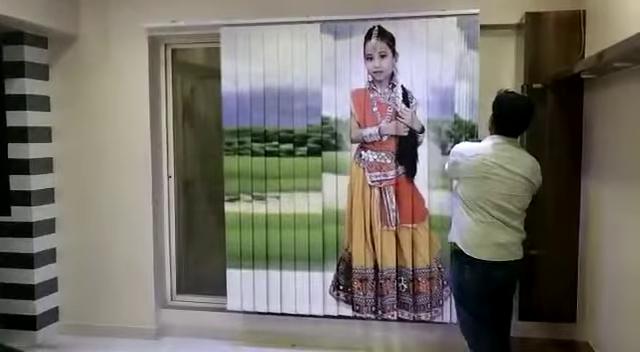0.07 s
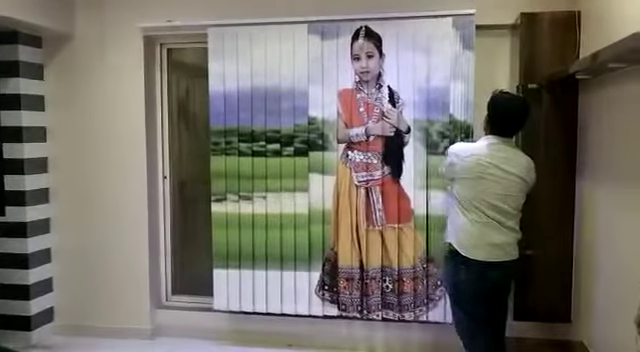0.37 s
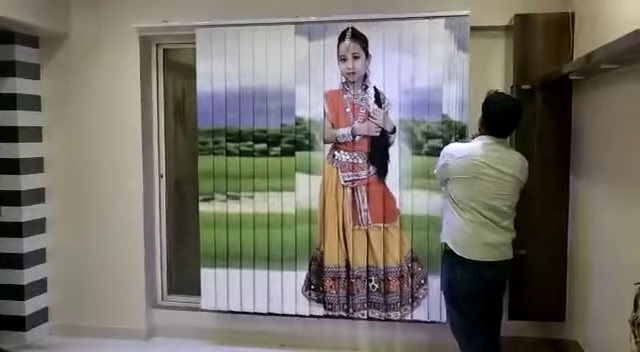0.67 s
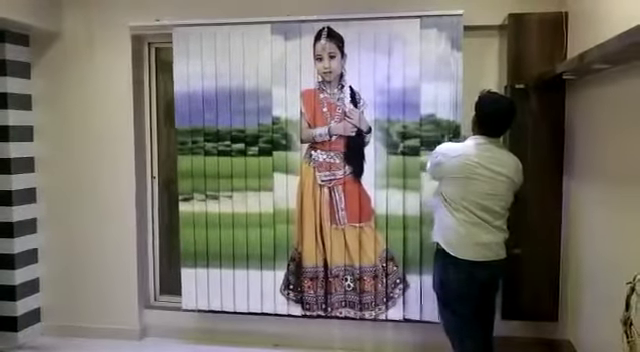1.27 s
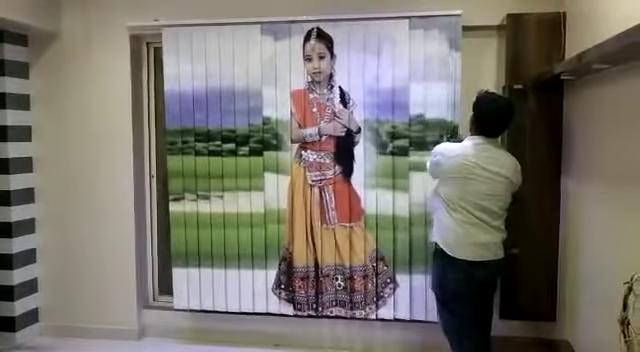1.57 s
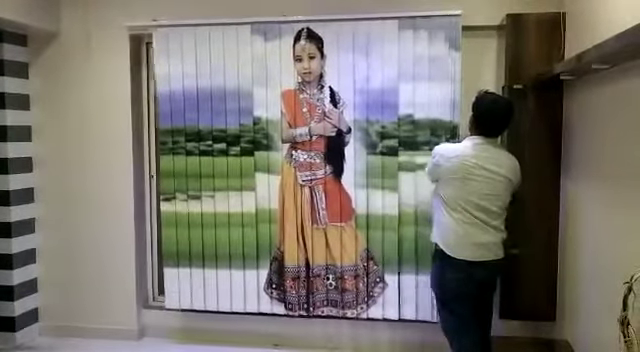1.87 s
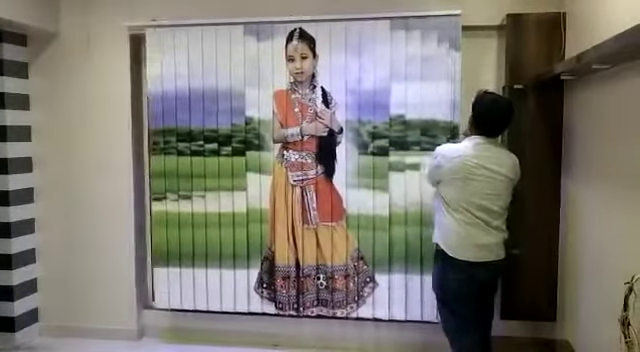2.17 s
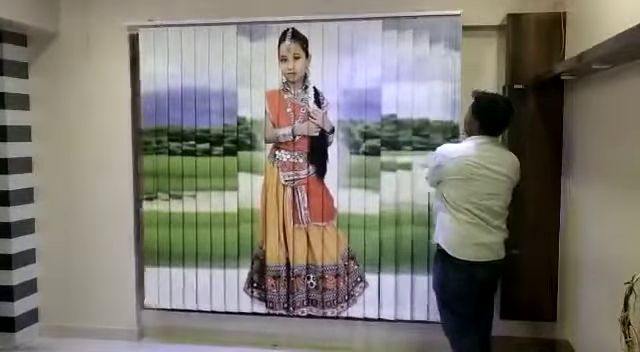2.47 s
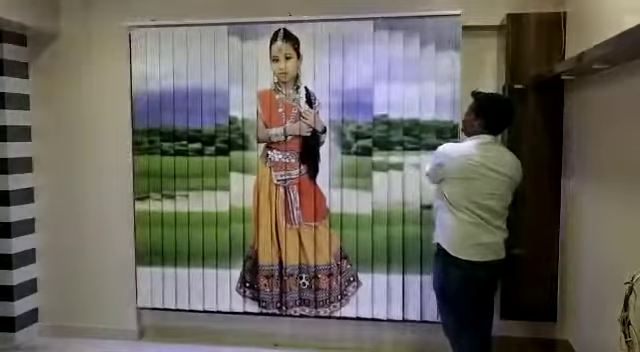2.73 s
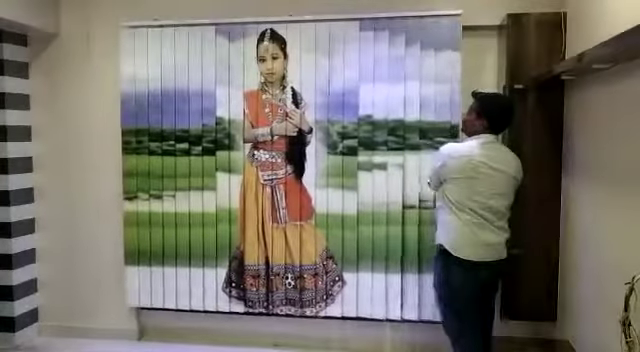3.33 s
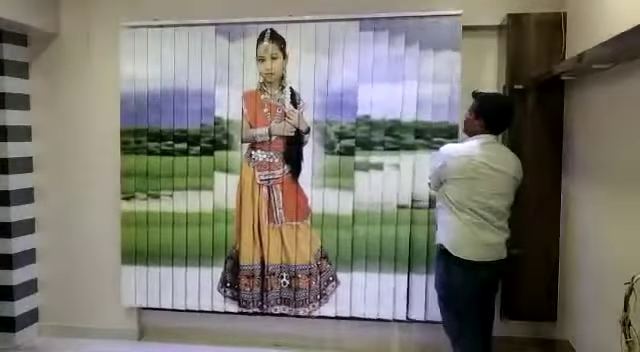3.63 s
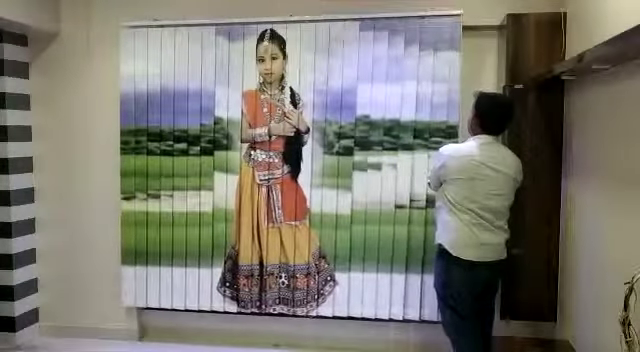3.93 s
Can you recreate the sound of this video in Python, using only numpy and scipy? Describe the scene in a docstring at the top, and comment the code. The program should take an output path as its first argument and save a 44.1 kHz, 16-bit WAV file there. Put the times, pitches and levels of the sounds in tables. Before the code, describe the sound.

Vertical blinds slide along their track from the start, a rubbing, finely ticking hiss that swells and dips with each pull while the rail rings on one flickering note. At about 3.2 seconds a last shove adds a low boom, and the gliders knock twice to a stop. The bare room's echo fades. Near 3.9 seconds the slats rustle softly and a glider squeaks faintly over a quiet fan.

```python
"""Vertical blinds are drawn along their track, pull after pull, in a bare, echoing room.
The gliders rub and tick in the rail, which sings one strong note over a few weaker rings.
A last shove brings a low boom, and the gliders knock to a stop.
The room dies away, then the slats rustle once and a settling glider squeaks over a faint fan."""
import sys
import numpy as np
from scipy import signal
from scipy.fft import rfft, irfft
from scipy.io import wavfile
from scipy.ndimage import uniform_filter1d

SR = 44100
rng = np.random.default_rng(int(sys.argv[2]) if len(sys.argv) > 2 else 0)


def unload_wav(signal):
    """Save mono or channel-first audio to the path in sys.argv[1] as 16-bit WAV at rate SR, clipped to [-1, 1]."""
    wavfile.write(
        sys.argv[1],
        SR,
        np.round(np.clip(np.atleast_2d(signal).T, -1, 1) * 32767).astype(np.int16),
    )


N = 176400
TIME = np.arange(N) / SR
FREQS = np.maximum(np.arange(N // 2 + 1) * SR / N, 1)

# how hard the blinds are pulled: (time [s], effort [dB])
PULL_EFFORT = [(0, -1.1), (.14, -0.9), (.265, -5), (.35, -1), (.47, 0.4), (.56, -1.5), (.68, -0.6),
               (.77, -6), (.88, -5), (.95, -2), (1.02, 2.5), (1.14, 0.5), (1.28, -1), (1.48, -0.5),
               (1.63, -2), (1.74, 0.8), (1.89, 0.5), (2.04, -1.56), (2.25, -1.5), (2.36, -5), (2.44, -2),
               (2.52, 1), (2.71, 2), (2.89, -3.5), (3.06, 0.4), (3.17, 2), (3.26, -1)]
# base colour of the glider friction: (frequency [Hz], level [dB/Hz])
RUB_COLOUR = [(50, -118), (110, -104), (150, -92), (240, -76.5), (520, -75.5), (850, -72), (1200, -69.5),
              (1850, -62.5), (2700, -68), (3600, -68), (4400, -74.5), (6000, -71.5), (7400, -73.5),
              (8800, -69.5), (9900, -75), (12000, -78.5), (13800, -82.5), (16000, -84)]
# body the last shove adds to the friction: (frequency [Hz], boost [dB])
SHOVE_BOOST = [(200, 1), (700, 5), (1200, 11), (2000, 1.5)]
# the friction's top end opens along the travel: (frequency [Hz], rise [dB/s])
RUB_BRIGHTENING = [(6000, 0), (13000, 0.5)]
# the rail's main note: (frequency [Hz], bandwidth [Hz], base peak [dB/Hz], left over right [dB])
NOTE_MODES = [(1360, 8.9, -49, 2.5), (1387, 54.3, -54.5, -6)]
# brief, irregular flares of the rail's note: (time [s], width [s], boost [dB])
NOTE_FLARES = [(.05, 0.021, 4.5), (.125, 0.054, 3), (.345, 0.0095, 0), (.435, 0.013, 3.5), (.542, 0.029, 6),
               (.762, 0.0078, 7), (1.04, .012, 4), (1.082, 0.018, 7.5), (1.14, 0.0078, 10),
               (1.183, 0.0099, 9.5), (1.365, 0.051, 5.5), (1.471, 0.0091, 8.5), (1.55, 0.019, 7),
               (1.64, 0.013, 7.5), (1.692, 0.018, 5), (1.74, 0.01, 8), (1.87, 0.027, 7.5),
               (1.966, 0.011, 4), (2.217, 0.01, 6), (2.352, 0.011, 6.5), (2.489, .012, 6),
               (2.635, 0.05, 4.5), (2.737, 0.021, 7), (2.84, 0.044, 3), (3.288, .012, 0.5)]
# the rail's weaker rings: (frequency [Hz], bandwidth [Hz], base peak [dB/Hz], left over right [dB])
WEAK_MODES = [(1242, 106, -61, 4.5), (3160, 154, -61.5, 1), (5100, 170, -68, 0), (6310, 35, -65.5, -3),
              (6354, 105, -68.5, -8.5), (7810, 590, -73.5, 0), (11230, 110, -76, 7),
              (12800, 150, -79.5, -1)]
# gliders bumping to a stop: (time [s], strike level [dB/Hz])
GLIDER_KNOCKS = [(3.325, -55), (3.362, -52)]
# base colour of the slats' rustle: (frequency [Hz], level [dB/Hz])
RUSTLE_COLOUR = [(120, -110), (300, -81), (700, -103), (1700, -84.5), (2600, -99), (4500, -102),
                 (16000, -112)]
# bed of fan and room air: (frequency [Hz], level [dB/Hz])
AIR_COLOUR = [(25, -120), (60, -114), (105, -107), (145, -87.5), (250, -82), (600, -87.5), (1300, -86.5),
              (2600, -93), (5000, -101), (6400, -102), (7800, -100), (9500, -102), (16000, -101)]
# the fan's hum lines: (frequency [Hz], rms level [dB])
FAN_HUM = [(244, -68), (372, -67.5), (620, -69), (870, -70.5)]
# length of the room's tail: (frequency [Hz], time to fall 60 dB [s])
REVERB_TIME = [(200, 1.2), (750, 1.07), (1400, 1.07), (2500, 0.92), (5000, 0.86), (10000, 0.23),
               (16000, 0.27)]
# stereo width, mono in the bass and wide on top: (frequency [Hz], likeness [1 or more is mono])
STEREO_LIKENESS = [(50, 3), (140, 0.9), (350, 0.85), (700, 0.67), (1300, 0.07), (16000, 0)]
# lean of the stereo image: (frequency [Hz], left over right [dB])
STEREO_BALANCE = [(100, -0.5), (400, -1), (1400, -2.5), (2000, -2.5), (3200, 1.3), (6300, 0.5), (9000, 1.5),
                  (15000, 0.5)]

STOP_S, STOP_DB_PER_S = 3.275, 179
SHOVE_S, SHOVE_WIDTH_S = 3.21, 0.048
# dB of swing in each layer per dB of pulling effort
BASS_FOLLOWS, TREBLE_FOLLOWS, NOTE_FOLLOWS, RINGS_FOLLOW = 0.93, 1.3, 0.61, 1.5


def glider_rub(effort_db, flutter_db=1.9, flutter_hz=55):
    """Sliding friction: overlapping noise bands ride the pull, each with its own flutter and tail."""
    spectrum, rub = room_spectrum(RUB_COLOUR), 0
    centres = np.geomspace(200, 14000, 12)
    for hz, weights in zip(centres, np.eye(len(centres))):
        band = irfft(spectrum * np.interp(np.log(FREQS), np.log(centres), weights), N)
        follows = at_hz([(400, BASS_FOLLOWS), (3000, TREBLE_FOLLOWS)], hz)
        shove_db = at_hz(SHOVE_BOOST, hz) * swell(SHOVE_S, SHOVE_WIDTH_S)
        bright_db = at_hz(RUB_BRIGHTENING, hz) * (TIME - STOP_S / 2)
        drive_db = follows * effort_db + shove_db + bright_db + flutter_db * drift(flutter_hz)
        rub = rub + band * in_room(until_stop(drive_db), hz)
    return treble_shimmer(rub)


def treble_shimmer(rub, treble_depth_db=10):
    """Random, drifting dips in the spectrum give the hiss a watery shimmer."""
    hz, _, frames = signal.stft(rub, SR, nperseg=2048)
    pattern = uniform_filter1d(rng.standard_normal(frames.shape), size=3, axis=1)  # smooth in pitch
    pattern = uniform_filter1d(pattern, size=7, axis=2)  # and in time
    depth_db = treble_depth_db * np.clip(hz / 4500, 0, 1)[:, None]
    gain = from_db(depth_db * np.clip(pattern / pattern.std(), -3, 1.2))  # deep dips, modest peaks
    gain = gain / np.sqrt(np.mean(gain ** 2, axis=2, keepdims=True))
    return signal.istft(frames * gain, SR)[1][:, :N]


def glider_ticks(effort_db, per_side_per_s=260, spread_db=2.5, trim_db=-10):
    """Gliders catch and slip: uneven little clicks in the friction's colour, with the lows cut."""
    sizes = from_db(spread_db * np.minimum(rng.exponential(1, (2, N)), 4))
    signs = rng.choice([-1, 1], (2, N))
    clicks = sizes * signs * (rng.random((2, N)) < per_side_per_s / SR)
    clicks = clicks / clicks.std() * np.sqrt(SR / 2) * until_stop(effort_db)
    coloured = irfft(rfft(clicks) * from_db(at_hz(RUB_COLOUR, FREQS) + trim_db), N)
    return signal.sosfilt(signal.butter(2, 900, "high", fs=SR, output="sos"), coloured)


def rail_note(effort_db, chatter_db=0.5, chatter_hz=70, levelling_s=0.044):
    """The rail's strongest resonance sings, chatters, and swells in brief, irregular flares."""
    flares_db = sum(db * swell(time_s, width_s) for time_s, width_s, db in NOTE_FLARES)
    accents = from_db(flares_db + chatter_db * drift(chatter_hz))
    drive, note = until_stop(NOTE_FOLLOWS * effort_db), 0
    for hz, width_hz, db, side_db in NOTE_MODES:
        tone = resonance(white(), hz, width_hz)
        power = uniform_filter1d(np.mean(tone ** 2, axis=0), size=int(levelling_s * SR))
        steady = tone * np.sqrt(power.mean() / power)  # even out the tone's random swells
        note = note + steady * from_db(db) * pan(side_db) * accents * in_room(drive, hz)
    return note


def rail_rings(effort_db):
    """Friction keeps the rail's weaker resonances ringing."""
    drive = until_stop(RINGS_FOLLOW * effort_db)
    return sum(resonance(white(), hz, width_hz) * from_db(db) * pan(side_db) * in_room(drive, hz)
               for hz, width_hz, db, side_db in WEAK_MODES)


def glider_knocks(hz=1400, width_hz=500, decay_s=.008):
    """The last gliders bump against their neighbours and briefly ring the rail."""
    strikes = sum(from_db(db) * (TIME > time_s) * np.exp(-np.abs(TIME - time_s) / decay_s)
                  for time_s, db in GLIDER_KNOCKS)
    return resonance(white(), hz, width_hz) * in_room(strikes, hz)


def end_boom(start_s=3.16, end_s=3.41, hz=243, drive_db=-53):
    """A low resonance sounds as the gliders reach the end, then dies in the room."""
    phase = np.angle(signal.hilbert(wavering_tone(hz, width_hz=8)))
    tone = np.cos(phase) * np.sqrt(2)  # wandering pitch at a steady level
    gate = (TIME > start_s) & (TIME < end_s)
    return tone * in_room(from_db(drive_db) * gate, hz)


def slat_rustle():
    """The hanging slats swing together once: a soft swell of brushing noise."""
    swing = from_db(2) * swell(time_s=3.91, width_s=.04)
    return irfft(room_spectrum(RUSTLE_COLOUR), N) * in_room(swing, hz=2000)


def glider_squeak():
    """A glider settles with a faint, dry, narrow ring off to the left."""
    ring = resonance(white(), hz=3550, width_hz=25)
    return ring * pan(7) * from_db(-82) * swell(time_s=3.96, width_s=.025)


def faint_hiss(hz=5798, width_hz=4001.5):
    """A very faint swell of high hiss, masked by the friction."""
    envelope = from_db(-91.5) * swell(time_s=2.5, width_s=0.15)
    return resonance(white(), hz, width_hz) * in_room(envelope, hz)


def fan():
    """A steady bed of moving air with a few wavering hum lines."""
    lines = [(wavering_tone(hz, width_hz=14.7), db) for hz, db in FAN_HUM]
    hum = sum(line / line.std() * from_db(db) for line, db in lines)
    return irfft(room_spectrum(AIR_COLOUR), N) + hum


def in_room(gain, hz, direct_share=0.51):
    """An envelope plus the room's tail, which builds up and dies away."""
    power = gain ** 2
    decay = from_db(-2 * 60 / (at_hz(REVERB_TIME, hz) * SR))  # power kept per sample
    tail = signal.lfilter([1 - decay], [1, -decay], power, zi=[decay * power[0]])[0]
    return np.sqrt(direct_share * power + (1 - direct_share) * tail)


def room_spectrum(colour):
    """Spectrum of a coloured noise with the room's stereo width and lean."""
    mid, side = rfft(white())
    alike = np.clip(at_hz(STEREO_LIKENESS, FREQS), -1, 1)
    stereo = np.sqrt((1 + alike) / 2) * mid + np.sqrt((1 - alike) / 2) * side * [[1], [-1]]
    return stereo * from_db(at_hz(colour, FREQS)) * pan(at_hz(STEREO_BALANCE, FREQS))


def until_stop(drive_db):
    """Drive as a gain, fading fast once the blinds stop."""
    return from_db(drive_db - STOP_DB_PER_S * np.maximum(TIME - STOP_S, 0))


def resonance(x, hz, width_hz):
    """Two-pole resonance with unity gain at its peak."""
    radius = np.exp(-np.pi * width_hz / SR)
    feedback = [1, -2 * radius * np.cos(2 * np.pi * hz / SR), radius ** 2]
    return signal.lfilter(np.array([1, 0, -1]) * (1 - radius ** 2) / 2, feedback, x)


def wavering_tone(hz, width_hz):
    """Mono noise narrowed to a tone by two passes through a resonance."""
    return resonance(resonance(white()[0], hz, width_hz), hz, width_hz)


def swell(time_s, width_s):
    """A bell-shaped rise and fall, peaking at 1."""
    return np.exp(-((TIME - time_s) / width_s) ** 2 / 2)


def drift(rate_hz):
    """Random modulation with a spread of 1, rolled off above its rate."""
    wander = irfft(rfft(rng.standard_normal(N)) / (1 + (FREQS / rate_hz) ** 2), N)
    return wander / wander.std()


def white():
    """Unrelated left and right noise at 0 dB/Hz."""
    return rng.standard_normal((2, N)) * np.sqrt(SR / 2)


def pan(side_db):
    """Left and right gains; positive leans left."""
    return from_db(np.array([[.5], [-.5]]) * side_db)


def at_hz(table, hz):
    """Read a curve on a log-frequency axis."""
    points_hz, values = np.transpose(table)
    return np.interp(np.log(hz), np.log(points_hz), values)


def from_db(db):
    """Decibels to gain."""
    return 10 ** (np.asarray(db) / 20)


def scene():
    """One pulling gesture drives gliders and rail; timed accents and the fan bed fill in around it."""
    effort_db = np.interp(TIME, *np.transpose(PULL_EFFORT))
    track = glider_rub(effort_db) + glider_ticks(effort_db) + rail_rings(effort_db) + rail_note(effort_db)
    accents = glider_knocks() + end_boom() + slat_rustle() + faint_hiss() + glider_squeak()
    return track + accents + fan()


def record(dry, cutoff_hz=15750):
    """A steep low-pass takes off the very top."""
    return signal.sosfilt(signal.ellip(12, .1, 80, cutoff_hz, fs=SR, output="sos"), dry)


dry = scene()
out = record(dry)
unload_wav(out)
```